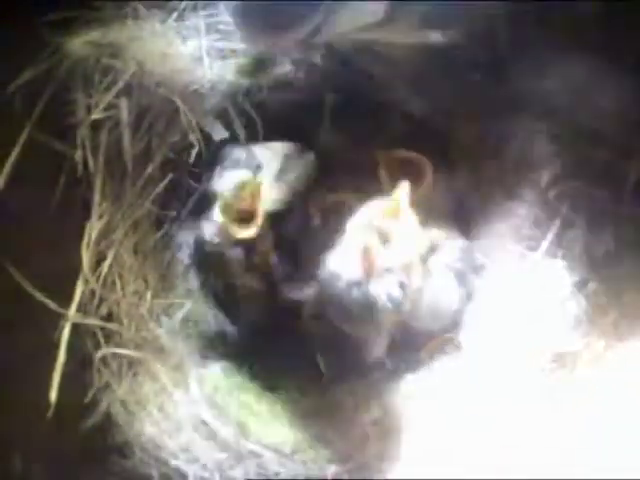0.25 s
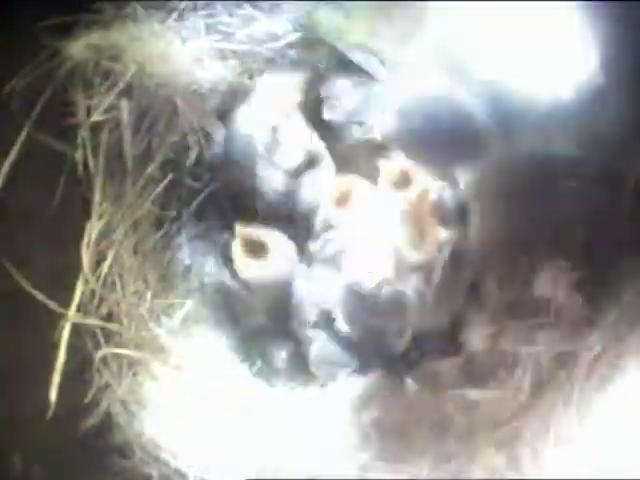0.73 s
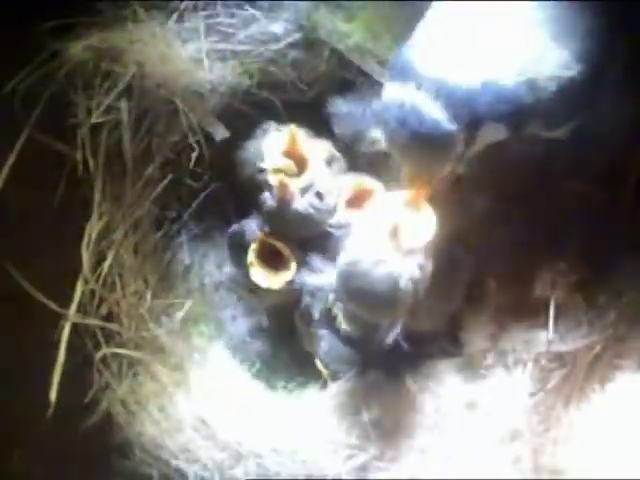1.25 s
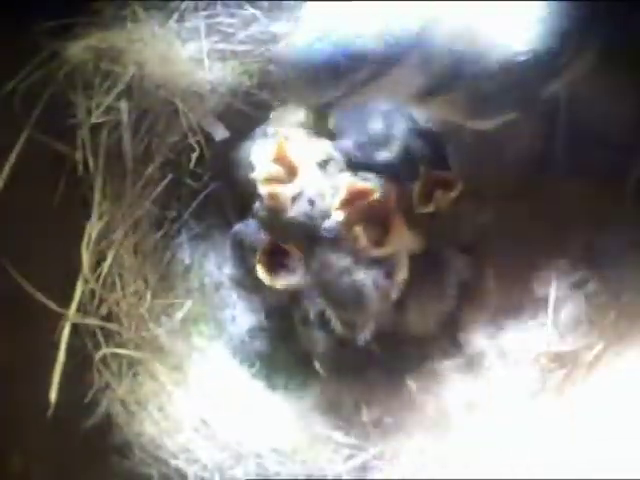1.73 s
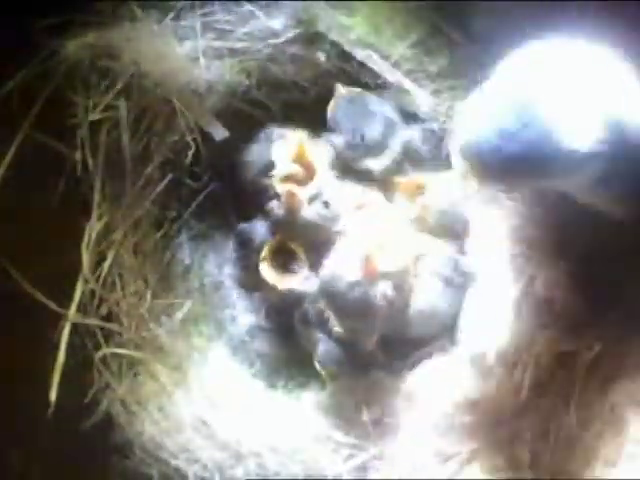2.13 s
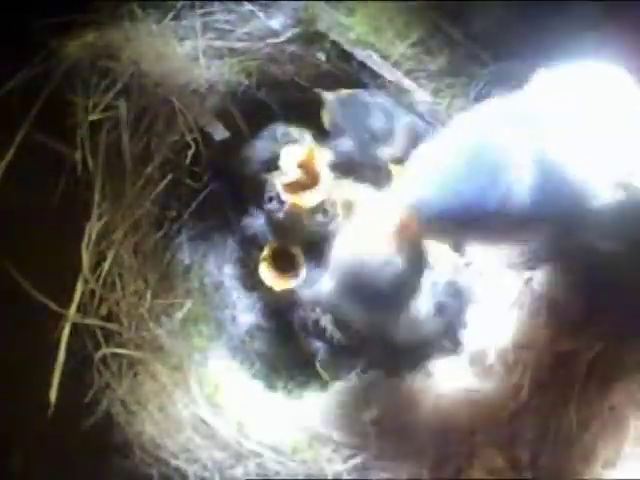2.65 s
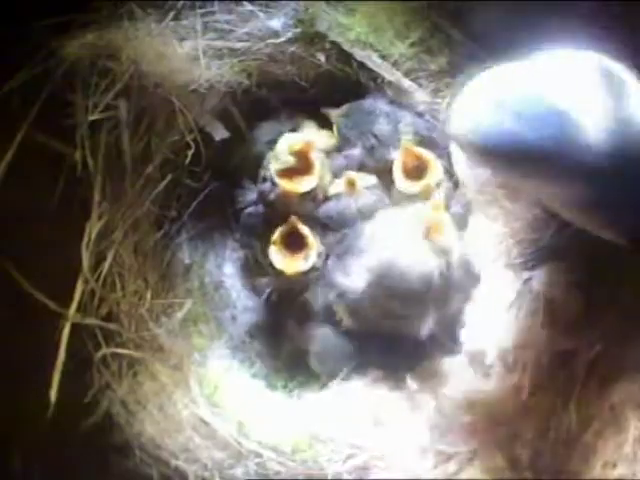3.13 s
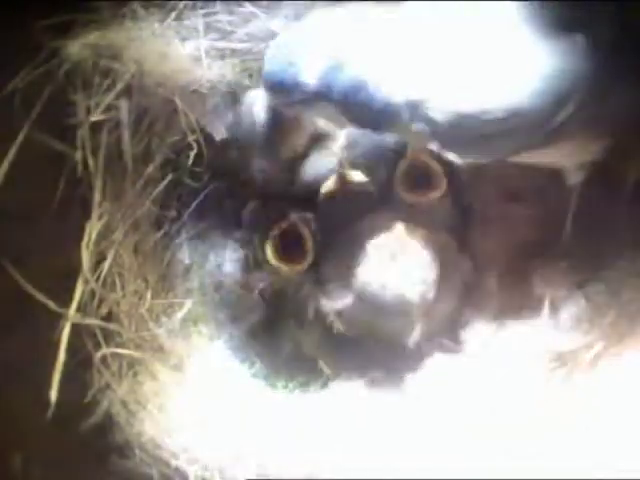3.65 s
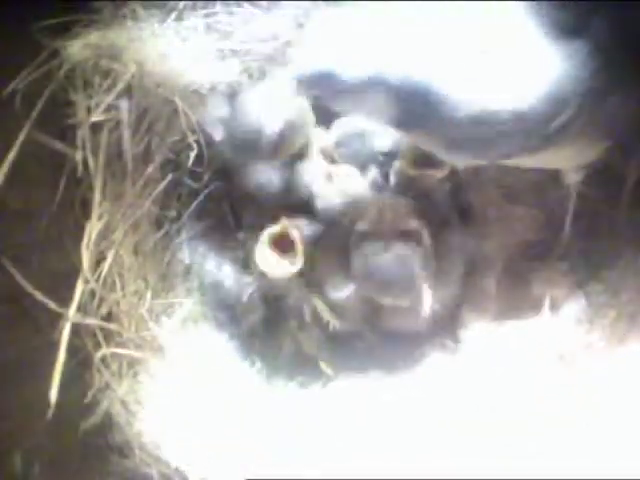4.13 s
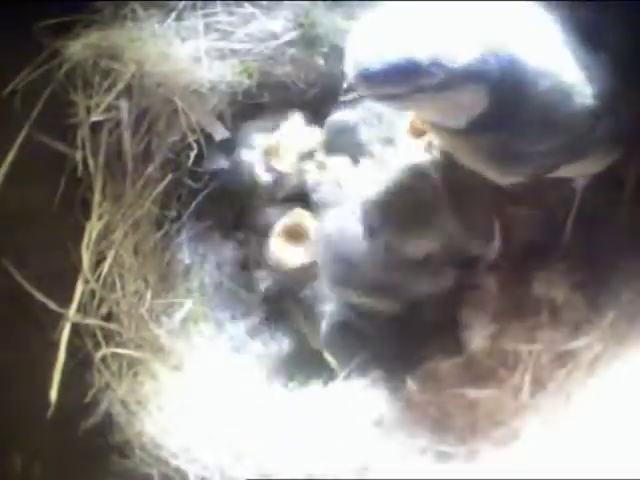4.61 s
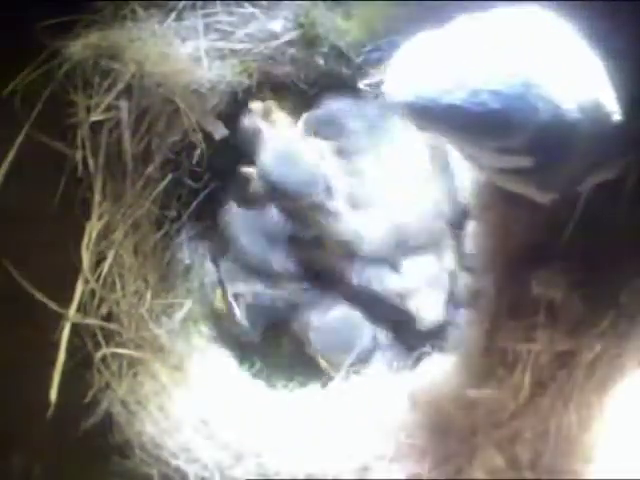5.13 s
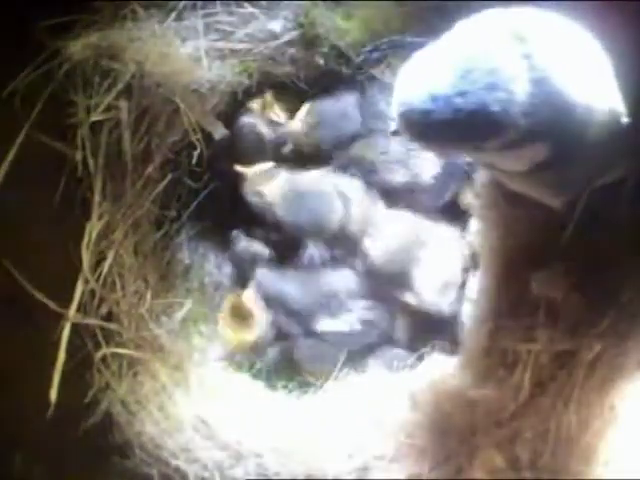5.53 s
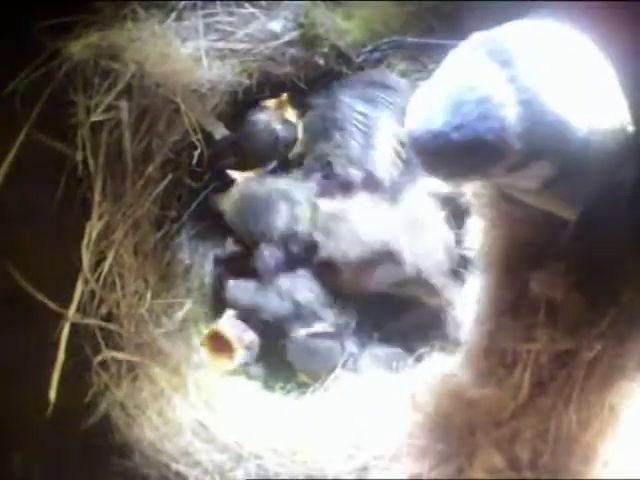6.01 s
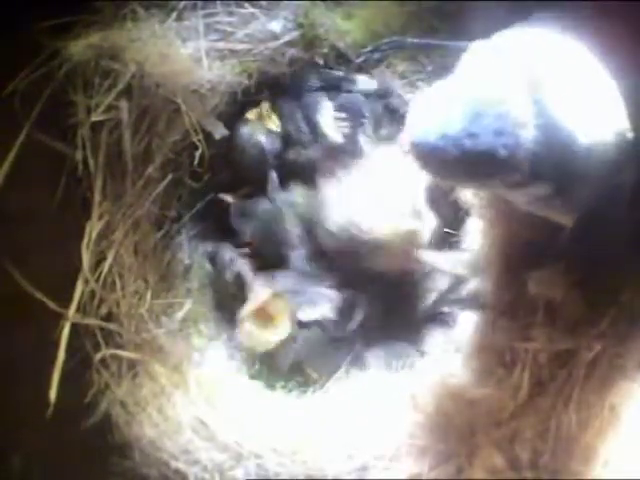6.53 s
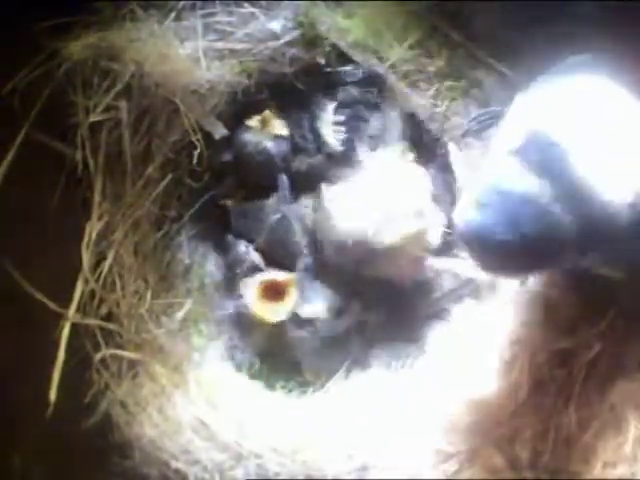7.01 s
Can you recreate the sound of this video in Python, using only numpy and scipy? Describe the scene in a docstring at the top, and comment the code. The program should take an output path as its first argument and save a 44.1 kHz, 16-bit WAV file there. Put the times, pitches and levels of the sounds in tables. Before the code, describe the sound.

Inside a small wooden nest box, a brood of chicks begs frantically. The nearest gives loud, very high whistles, swooping down into a fast warble and clipping the microphone. Hoarser siblings overlap it, thick at first, then thinner and fainter past the middle, with a few short lower notes from the parent late on. Distant traffic rumbles, an engine drones by, and electrical buzz and whine persist. Sound sits almost entirely on the left.

```python
"""Inside a wooden nest box, right under a small camera microphone that feeds the left channel only.
The loudest chick, closest in level, whistles in warbling calls that overload the input.
The other chicks overlap it with hoarser cheeps, and the parent answers lower; all are noisy syrinx tones.
Far traffic rumbles as shaped noise, an engine drones past, and the picture signal leaks in as buzz and whine.
The right input idles in hiss with a very faint leak of the birds."""
import sys
import numpy as np
from scipy import signal
from scipy.fft import rfft, irfft, next_fast_len
from scipy.io import wavfile
from scipy.ndimage import uniform_filter1d, map_coordinates

SR = 44100
rng = np.random.default_rng(int(sys.argv[2]) if len(sys.argv) > 2 else 0)


def to_wav(sig):
    """Store sig (one row per channel, or 1-D mono) as 16-bit WAV at the path in sys.argv[1].

    Samples outside -1..1 are clipped; the rate is SR.
    """
    pcm = np.clip(np.atleast_2d(sig), -1, 1) * 32767
    pcm = np.round(pcm).astype(np.int16)
    wavfile.write(sys.argv[1], SR, pcm.T)  # frames by channels


N = 320166
T = np.arange(N) / SR

# far traffic: start_s, rumble_db, road_roar_db
TRAFFIC = [(0.0, -21.5, -23.5), (0.99, -24, -29), (1.8, -30, -29.5), (2.75, -26, -29), (3.3, -23, -29),
           (4.0, -26, -29.5), (5.0, -25.5, -27.5), (6.2, -29, -31.5), (7.26, -29, -30)]
# drone of a passing engine: start_s, level_db
ENGINE = [(0.0, -39), (2.2, -38), (3.0, -18.5), (3.7, -26), (3.94, -25), (4.6, -27.5), (5.0, -36),
          (7.26, -41)]
# relative noise spectra, outside air with input hiss, road roar, deep rumble: freq_hz, density_db (per Hz)
OUTDOOR_AIR = [(220, 3), (350, -12.5), (520, -2), (800, -9.5), (1030, 1), (1250, -14.5), (1900, -25),
               (3000, -28), (4200, -24.5), (7000, -32), (12500, -44), (14600, -34), (15200, -17),
               (15750, -14)]
ROAR = [(90, -22), (120, 5), (150, 11.5), (200, 6.5), (240, -30.5)]
RUMBLE = [(12, -6), (25, 1), (40, 2), (55, -6.5), (110, -9.5), (140, -59)]
# relative hiss spectrum of the unused right input: freq_hz, density_db (per Hz)
IDLE = [(20, 10), (1000, -15), (6000, -23), (11500, -17), (12300, -47), (12600, -43), (22000, -49)]
# faint low toots: start_s, length_s, pitch_hz, peak_db
TOOTS = [(0.305, 0.025, 560, -28), (0.371, 0.028, 546, -22), (0.422, 0.058, 550, -20.5)]
# harmonics of the picture rate: freq_hz, level_db (each)
BUZZ = [(180, -73), (250, -48), (600, -51.5), (1500, -60.5), (3000, -72.5), (5000, -77), (15400, -77),
        (15600, -71), (15750, -47.5)]
# line scan and its half, before the feeds into the cable: freq_hz, level_db
WHINE = [(7812.5, -46.5), (15625, -37)]
# low rough cries: start_s, length_s, pitch_hz, level_db, third_harmonic_db
SQUAWKS = [(0.434, 0.032, 3900, -41, -26), (1.06, .035, 3740, -49, -41), (1.354, 0.058, 3720, -32.5, -25),
           (0.617, 0.027, 3610, -37, -19), (1.584, 0.034, 3660, -40, -23), (2.301, 0.065, 3630, -41, -24),
           (4.582, 0.05, 3600, -45, -30), (4.787, .07, 3820, -43, -29.5), (5.144, 0.056, 3720, -36.5, -25),
           (6.654, 0.044, 3270, -31, -46), (7.06, 0.038, 3580, -40, -52)]
# the parent's short low notes, before the split into two voices:
# start_s, length_s, start_pitch_hz, end_pitch_hz, start_level_db, end_level_db
PARENT = [(5.795, 0.024, 4360, 4310, -32, -23), (6.025, 0.054, 3040, 3380, -17, -17.5),
          (6.324, 0.0089, 3270, 3180, -27, -24), (6.635, 0.012, 3240, 3240, -29, -25)]
# the other chicks: same columns as the parent
BROOD = [(0.0, 0.17, 7350, 7630, -5.5, -18), (0.0, 0.039, 7860, 8650, -3, -21),
         (0.19, 0.12, 7150, 7500, -12.5, -6.5), (0.31, 0.069, 7530, 6630, -10.5, -20.5),
         (0.367, 0.043, 8150, 7900, -12, -2.5), (0.395, 0.071, 7980, 8900, -14, -5),
         (0.41, 0.056, 7140, 7700, -11, -10.5), (0.6, 0.059, 7600, 7770, -4, -5),
         (0.665, 0.067, 7400, 7100, -11.5, -26), (0.93, 0.037, 7250, 7450, -9.5, -10.5),
         (0.965, 0.032, 6900, 6400, -29, -19), (1.0, 0.093, 8250, 8500, -9.5, 3),
         (0.985, 0.09, 7300, 6600, -11, -19), (1.265, 0.053, 8300, 8500, 10, -9.5),
         (1.27, 0.025, 7600, 6900, 2, -16), (1.33, 0.058, 8200, 9000, -12, -15),
         (1.35, 0.087, 7100, 7400, -16, -4.5), (1.595, 0.11, 7370, 7170, -6.5, -14),
         (1.63, 0.17, 7980, 8450, -13, -4), (1.71, 0.07, 6530, 5900, -31, -30),
         (1.965, 0.041, 7800, 8300, -7, -7.5), (1.97, 0.085, 7120, 6860, -6, -12.5),
         (2.065, 0.1, 8060, 7650, -15, -0.5), (2.3, 0.054, 7470, 7340, -4, -5),
         (2.31, 0.088, 8200, 7970, -10, -4.5), (2.4, 0.11, 7500, 7400, -10, -12.5),
         (2.645, 0.075, 7480, 7200, -5, -17), (2.69, 0.12, 8190, 7750, -18, -9),
         (2.72, 0.11, 7400, 7500, -10.5, -14.5), (3.0, 0.037, 8230, 7700, -2, -11),
         (3.02, 0.067, 7450, 7160, -14.5, -21.5), (3.33, 0.039, 7290, 6800, -9, -17.5),
         (3.465, 0.051, 8100, 8200, -24, -7), (3.465, 0.044, 7060, 7100, -26, -15),
         (3.685, 0.077, 7000, 7100, -21, -27), (3.69, 0.035, 7450, 7800, -24, -31),
         (3.99, 0.068, 7400, 6840, -7, -19), (4.155, 0.022, 7500, 7700, -27, -26),
         (4.515, 0.035, 7200, 6650, -22.5, -22.5), (4.55, 0.09, 6510, 8030, -25.5, -13),
         (4.75, 0.031, 8000, 7740, -6, -9), (4.81, 0.049, 8200, 8050, -12, -15.5),
         (4.927, 0.083, 7100, 7240, -27, -20.5), (4.93, 0.059, 8600, 8200, -23.5, -27),
         (5.06, 0.059, 8070, 7900, -11, -18.5), (5.07, 0.058, 6900, 7300, -32, -20),
         (5.135, 0.07, 8700, 7860, -22.5, -16.5), (5.14, 0.086, 7200, 7100, -25, -21),
         (5.235, 0.059, 7200, 7300, -25.5, -20), (5.255, 0.13, 8200, 7500, -22, -24.5),
         (5.3, 0.11, 7060, 7060, -21.5, -18), (5.78, 0.081, 6800, 6500, -19, -33),
         (5.945, 0.11, 7000, 6800, -30, -33), (6.04, 0.03, 6440, 5000, -33, -29),
         (6.095, 0.03, 6300, 5600, -31, -26), (6.165, 0.043, 8070, 7600, -17, -24.5),
         (6.26, 0.067, 8500, 7800, -31.5, -30), (6.305, 0.092, 6950, 6400, -25.5, -26),
         (6.34, 0.056, 5740, 5800, -27, -30), (6.617, 0.032, 7450, 6600, -24.5, -25),
         (6.65, 0.095, 5700, 6000, -22, -36), (6.67, 0.043, 8100, 7600, -22, -17),
         (6.66, 0.04, 7300, 6800, -23, -43), (6.765, 0.13, 7620, 7800, -21.5, -29.5),
         (6.79, 0.084, 7300, 6930, -34, -23.5), (7.05, 0.063, 6000, 6600, -34, -18.5),
         (7.1, 0.076, 8420, 6800, -23, -29), (7.12, 0.066, 7400, 6900, -23, -20.5),
         (7.21, 0.045, 7150, 7300, -33, -25)]
# the loudest calls: start_s, length_s, swoop_hz, pitch_hz (after the swoop), end_pitch_hz (before the sag),
# middle_level_db, end_level_db, warble_rate_hz, warble_depth_hz (before it grows), warble_lag_ms
LEAD = [(0.046, 0.063, 30, 8650, 8150, -5, -8, 27, 50, 19.7),
        (0.163, 0.14, 141, 8380, 8355, -3, -9, 46, 30, 4.3),
        (0.427, 0.18, 887, 8470, 8070, -0.7, -6, 39, 54, 6.2),
        (0.741, 0.18, 997, 8336, 8320, 3, -0.5, 47, 81, 7.4),
        (1.072, 0.2, 658, 8380, 8250, 3.5, -5, 40, 70, 10.6),
        (1.41, 0.19, 999, 8250, 8144, 4, -0.5, 40, 68.4, 18),
        (1.761, 0.2, 672, 8360, 8294, 2.5, 1.5, 43.4, 87, 24.6),
        (2.138, 0.16, 881, 8300, 8180, 4, -2, 45, 69, 4.3),
        (2.488, 0.16, 999, 8270, 8175, 4, 2, 37, 61.3, 3.3),
        (2.815, 0.18, 1053, 8100, 8200, 5, -4, 42, 91, 15.3),
        (3.139, 0.19, 1050, 8435, 8070, 2.5, -0.5, 35, 89, 16.6),
        (3.512, 0.17, 881, 8395, 8160, 4, 0.5, 45, 78, 10.1),
        (3.831, 0.16, 1005, 8040, 8270, 4, -0.5, 42.6, 62, 5.2),
        (4.174, 0.19, 895, 8420, 8095, 2.5, 6.5, 52, 98.5, 9.3),
        (4.629, 0.18, 984, 8010, 8234, 5.5, -9, 41.5, 75, 23.1),
        (5.008, 0.041, 290, 8670, 8440, -11.5, -14, 35, 69, 0.6),
        (5.392, 0.16, 1099, 8206, 8490, 1.5, -1.5, 51, 39.7, 16.2),
        (5.676, 0.17, 748, 8360, 8230, 3.5, -9.5, 43.5, 26.2, 29.5),
        (5.987, 0.18, 606, 8530, 8430, -3.5, -11, 35, 77, 1),
        (6.327, 0.16, 932, 8120, 8350, -1, -6.5, 34, 55.6, 10),
        (6.636, 0.12, 1330, 7760, 8340, 4.5, 3.5, 37, 86, 0.45),
        (6.923, 0.16, 1035, 8200, 8255, 4.3, -4.5, 42, 82, 24)]
# short dips in the loudest chick's level, probably beating with siblings: centre_s, width_ms
DIPS = [(0.205, 1.6), (0.216, 2.8), (0.228, 3.8), (0.244, 2.1), (0.275, 1.7), (0.451, 3), (0.468, 4.1),
        (4.192, 1.9), (4.206, 4.8), (4.766, 15.6), (5.406, 7.5), (5.417, 4.5), (5.437, 1.7), (5.518, 2.8),
        (5.758, 10.5), (5.78, 4.2), (5.803, 12.5), (5.826, 2.9), (6.011, 2.7), (6.018, 2.6), (6.07, 2.2),
        (6.078, 2.9), (6.099, 2.2), (6.131, 3), (6.147, 1.9), (6.346, 3.8), (6.39, 4.4), (6.433, 4.7),
        (6.67, 13), (6.689, 40), (6.716, 8.3), (6.736, 5.2), (6.965, 11), (6.986, 14), (7.006, 11),
        (7.029, 9.9), (7.056, 4)]
# relative spectrum of air rushing from a gaping beak: freq_hz, density_db (per Hz)
BREATH = [(1200, -19), (2500, -3), (4200, 1.5), (5200, -2.5), (6500, 2), (10000, -20), (11500, -17),
          (12700, -27), (14500, 2), (15700, 3.5)]
# relative spectrum of a bright noise layer around 9-11 kHz over the calls: freq_hz, density_db (per Hz)
BRIGHT_NOISE = [(7600, -30), (8800, 0), (9500, -3), (11200, -7), (12200, -20), (13000, -120)]

SWOOP_S, SWOOP_SLOWS = .0105, .0012  # swoop time in s, and s added per second of the scene
BUILD_DB = 3.5  # a lead call starts this far under its middle
DIP_DB = -25  # depth of one dip
TOP_HZ = 15760  # upper end of the recorded band


def amp(db):
    """dB to gain."""
    return 10 ** (np.asarray(db) / 20)


def unit(x):
    """Scaled to rms 1."""
    return x / np.sqrt(np.mean(np.abs(x) ** 2) + 1e-20)


def along(points, hz):
    """Reads (Hz, value) points on a log frequency axis, holding the end values."""
    f, v = np.transpose(points)
    return np.interp(np.log(hz + 1), np.log(f + 1), v)


def filtered(x, response):
    """x times a response of frequency."""
    m = next_fast_len(len(x) + 8192)
    spectrum = rfft(x, m) * response(np.fft.rfftfreq(m, 1 / SR))
    return irfft(spectrum, m)[:len(x)]


def noise(spectrum):
    """Shaped noise of rms 1, fading out below the first point."""
    shut = [(spectrum[0][0] / 2, -120)] + list(spectrum)
    return unit(filtered(rng.standard_normal(N), lambda hz: amp(along(shut, hz))))


def wobble(rate, size):
    """A smooth random curve, rate knots a second."""
    knots = rng.standard_normal(int(size * rate / SR) + 4)
    return map_coordinates(knots, [np.arange(size) * rate / SR])


def add(track, s, note):
    """Mixes a note in at time s."""
    part = track[round(s * SR):][:len(note)]
    part += note[:len(part)]


def outdoors():
    """Far traffic as rumble and road roar, a wavering engine drone, and gently uneven outside air."""
    s, rumble_db, roar_db = np.transpose(TRAFFIC)
    rumble = amp(np.interp(T, s, rumble_db)) * noise(RUMBLE)
    roar = amp(np.interp(T, s, roar_db)) * noise(ROAR)
    engine_hz = 72 + 2.556 * wobble(9, N)
    engine = np.sqrt(2) * np.sin(2 * np.pi * np.cumsum(engine_hz) / SR)
    engine *= amp(np.interp(T, *np.transpose(ENGINE)) + 0.62 * wobble(12, N))
    lumps = amp(2.0 * wobble(8, N))
    air = lumps ** 0.34 * amp(-33) * noise(OUTDOOR_AIR)
    return lumps * (rumble + roar) + engine + air


def tooting():
    """Soft short sine tones from outside, each swelling and fading."""
    out = np.zeros(N)
    for s, length, hz, peak_db in TOOTS:
        t = np.arange(round(length * SR)) / SR
        swell = np.sin(np.pi * t / length)
        add(out, s, amp(peak_db) * swell * np.sin(2 * np.pi * hz * t))
    return out


def picture_buzz():
    """One click per picture field, 50 a second, filtered into a buzz."""
    clicks = np.zeros(N)
    clicks[241::SR // 50] = SR / 50 / np.sqrt(2)  # every harmonic at rms 1
    return filtered(clicks, lambda hz: amp(along(BUZZ, hz)))


def line_whine():
    """Steady sines at the line-scan rate and its half."""
    return sum(np.sqrt(2) * amp(db) * np.sin(2 * np.pi * hz * T) for hz, db in WHINE)


def smear(size, below_hz, above_hz):
    """Complex noise whose spectrum falls away to both sides of zero, in uneven bursts."""
    hz = np.fft.fftfreq(size, 1 / SR)
    width_hz = np.where(hz < 0, below_hz, above_hz)
    slope = 1 / (1 + np.abs(hz / width_hz) ** 2.9) ** 1.18
    white = rng.standard_normal(size) + 1j * rng.standard_normal(size)
    return unit(np.fft.ifft(white * slope) * amp(2.3 * wobble(121.6, size)))


def whistle(hz, db, hoarse, width_hz, octave_db, attack):
    """A syrinx tone: unsteady membranes smear part of it into a skirt, wider on the high side."""
    hoarse = np.clip(hoarse, 0, .98)
    carrier = np.exp(2j * np.pi * np.cumsum(hz) / SR)
    skirt = hoarse * smear(len(hz), width_hz, 1.25 * width_hz)
    wave = (np.sqrt(1 - hoarse ** 2) + skirt) * carrier
    octave = amp(octave_db) * unit(wave ** 2).real  # squaring doubles the pitch
    t = np.arange(len(hz)) / SR
    ramp = np.minimum(t / attack, t[::-1] / 0.0031)  # attack and release in s
    fade = np.sin(np.pi / 2 * np.clip(ramp, 0, 1)) ** 2
    return np.sqrt(2) * fade * amp(db) * (wave.real + octave)


def cheeps(calls, hoarse, wander_hz, quaver_hz, width_hz, octave_db, split_hz, second_db):
    """Gliding hoarse whistles with a quaver; the syrinx's other half sings a little lower and beats."""
    out = np.zeros(N)
    for s, length, hz0, hz1, db0, db1 in calls:
        t = np.arange(round((length + .008) * SR)) / SR  # room for the fades
        pitch = np.interp(t, [0, length], [hz0, hz1])
        pitch += wander_hz * wobble(22, len(t)) + quaver_hz * wobble(110, len(t))
        level_db = np.interp(t, [0, length], [db0, db1]) + 1.1 * wobble(172.4, len(t))
        upper = pitch + .3 * split_hz
        lower = upper - split_hz * (1 + .25 * wobble(18, len(t)))
        lower_db = level_db + second_db + 4 * wobble(24.8, len(t))
        note = whistle(upper, level_db - 1.65, hoarse, width_hz, octave_db, attack=0.0037)
        note += whistle(lower, lower_db, hoarse, width_hz, octave_db, attack=0.0023)
        add(out, max(s - .006, 0), note)
    return out


def squawks():
    """Almost pitchless cries: a smeared low tone and a separate third harmonic."""
    out = np.zeros(N)
    for s, length, hz, db, third_db in SQUAWKS:
        pitch = hz + 90 * wobble(55.4, round(length * SR))
        add(out, s, whistle(pitch, db, 0.89, width_hz=890, octave_db=-30, attack=0.007))
        add(out, s, whistle(3 * pitch, third_db, 0.71, width_hz=1100, octave_db=-60, attack=0.0072))
    return out


def parent():
    """Short low notes from the same two-voiced syrinx, with a narrow skirt and split."""
    return cheeps(PARENT, hoarse=0.52, wander_hz=29.7, quaver_hz=50.3, width_hz=330,
                  octave_db=-20, split_hz=149, second_db=-10)


def back_sibling():
    """A sibling at the back joins each lead call, lower, very hoarse and half hidden."""
    calls = []
    for (s, length, *_), (a, b, c) in zip(LEAD, rng.standard_normal((len(LEAD), 3))):
        start_hz, end_hz = 7350 + 250 * a, 7150 + 250 * b
        calls.append((s + .01, .9 * length, start_hz, end_hz, -17.5 + 2 * c, -17.6 - 2 * c))
    return cheeps(calls, hoarse=0.68, wander_hz=149, quaver_hz=160.5, width_hz=640,
                  octave_db=-17.5, split_hz=450, second_db=-8)


def brood():
    """The other chicks: hoarse two-voiced cheeps between and over the lead calls."""
    return cheeps(BROOD, hoarse=0.45, wander_hz=59.94, quaver_hz=94.8, width_hz=560,
                  octave_db=-22, split_hz=400, second_db=-7)


def lead_chick():
    """Most calls swoop down onto a warbling whistle, hoarser when weak, the swoop slowing as the chick tires;
    the first two, perhaps another chick's, hardly swoop."""
    out = np.zeros(N)
    for s, length, swoop_hz, hz0, hz1, db, end_db, rate, warble_hz, lag_ms in LEAD:
        t = np.arange(round(length * SR)) / SR
        swoop = np.exp(-(t / (SWOOP_S + SWOOP_SLOWS * s)) ** 2.13)
        # the warble sets in over the first 31 ms and deepens through the call
        growth = np.clip(t / 0.0308, 0, 1) * (0.853 + 1.14 * t / length)
        warble = growth * np.sin(2 * np.pi * rate * (t - lag_ms / 1000))
        hz = hz0 + (hz1 - hz0) * t / length + swoop_hz * swoop
        hz += warble_hz * warble + 55 * wobble(220.2, len(t))
        # the pitch sags as the breath runs out
        hz -= 300 * np.exp(-(length - t) / 0.00777)
        effort_db = np.interp(t, [0, length / 2, length], [db - BUILD_DB, db, end_db])
        hoarse = .29 - 0.0077 * effort_db + 0.51 * swoop
        level_db = effort_db - 7.6 * swoop + 0.81 * warble
        add(out, s, whistle(hz, level_db, hoarse, width_hz=670, octave_db=-61, attack=0.002))
    dips_db = sum(DIP_DB * np.exp(-((T - s) * 2000 / ms) ** 2) for s, ms in DIPS)
    return out * amp(dips_db)


def rasp(birds):
    """Breath noise in bursts that follows the calls' strength, and a bright noise layer, uneven in level."""
    power = uniform_filter1d(birds ** 2, size=260)  # over about 6 ms
    strength = np.minimum(np.sqrt(np.abs(power)), .9)
    breath_db = -21 + 2.8 * wobble(45, N) + 2.07 * wobble(320, N)
    breath = strength ** 1.65 * amp(breath_db) * noise(BREATH)
    bright_db = -27 + 5.5 * wobble(24, N) + 3.1 * wobble(150, N)
    return breath + strength ** 1.13 * amp(bright_db) * noise(BRIGHT_NOISE)


def nest_box(x):
    """The close wooden walls answer with a noise tail that falls 60 dB in 28 ms."""
    t = np.arange(SR // 20) / SR
    tail = rng.standard_normal(len(t)) * amp(-60 * t / 0.028)
    return signal.fftconvolve(x, tail / np.linalg.norm(tail))[:N]


def scene():
    """The microphone's sound on the left; idle hiss and a faint leak of the birds on the right."""
    birds = squawks() + parent() + back_sibling() + brood() + lead_chick()
    background = outdoors() + tooting() + picture_buzz()
    left = background + birds + rasp(birds) + amp(-10) * nest_box(birds)
    right = amp(-71) * noise(IDLE) + amp(-76) * birds
    return np.array([left, right])


def record(dry):
    """The cable picks up whine; the preamplifier flattens loud calls, ducking all else under them; the band ends."""
    whine = line_whine()
    # bend the wave at four times the rate to limit aliasing
    fine = signal.resample_poly(dry[0] + 0.58 * whine, up=4, down=1)
    flat = fine / (1 + np.abs(fine / .84) ** 6) ** (1 / 6)  # never passes .84
    left = signal.resample_poly(flat, up=1, down=4)[:N] + .009  # small constant offset
    left += 0.42 * whine  # part of it enters after the preamplifier
    return np.array([filtered(x, lambda hz: hz < TOP_HZ) for x in (left, dry[1])])


dry = scene()
out = record(dry)
to_wav(out)
```